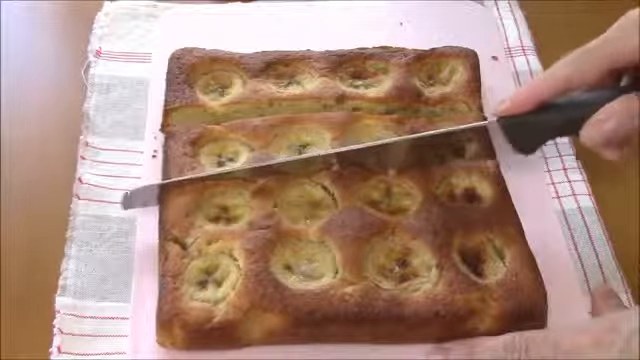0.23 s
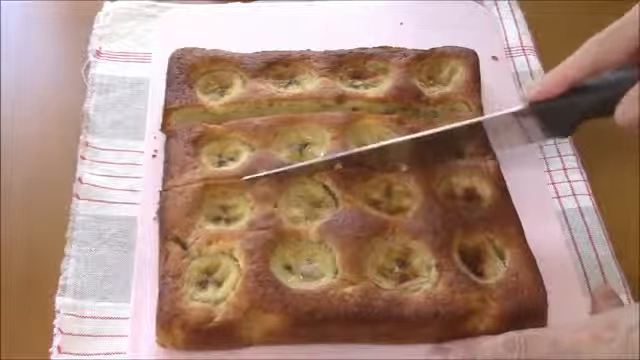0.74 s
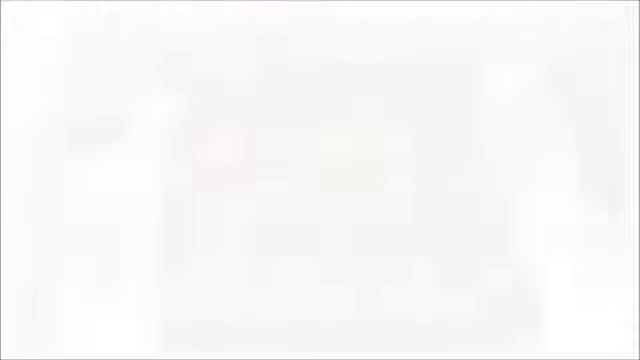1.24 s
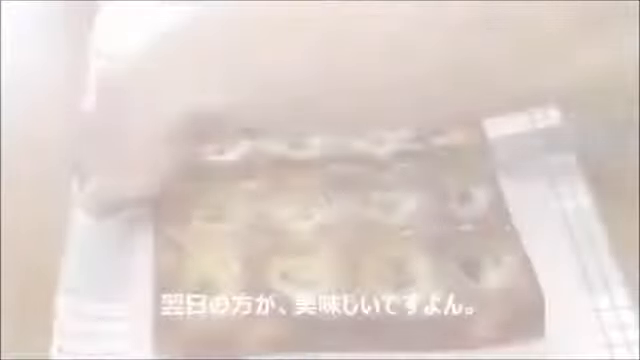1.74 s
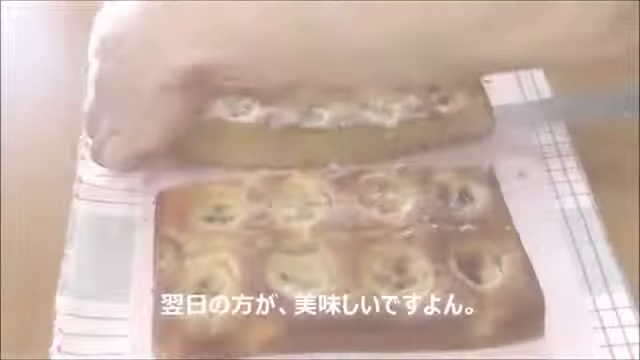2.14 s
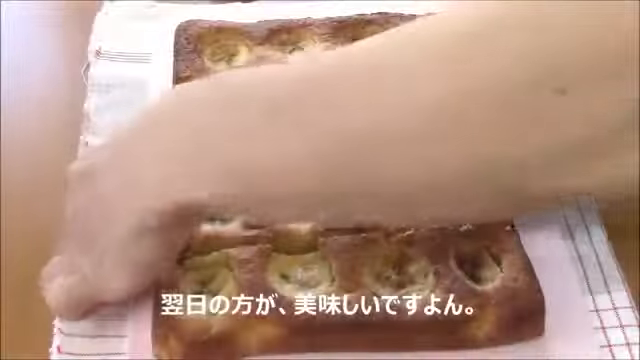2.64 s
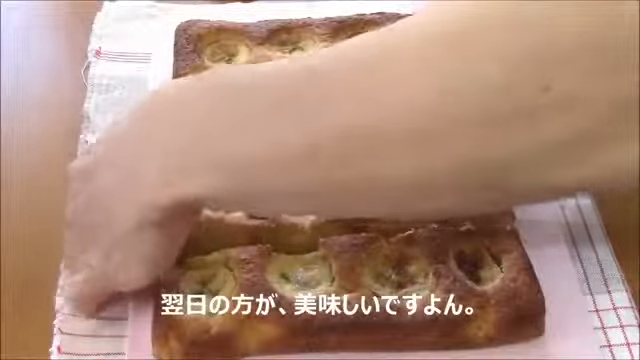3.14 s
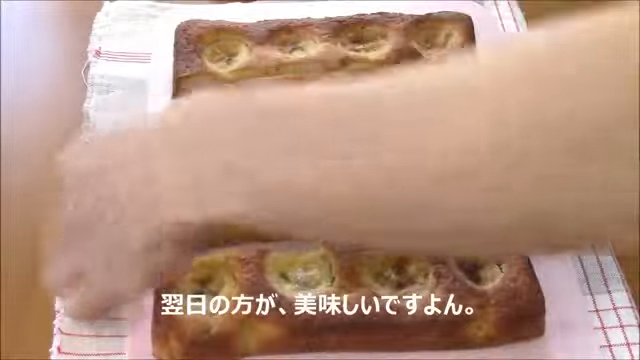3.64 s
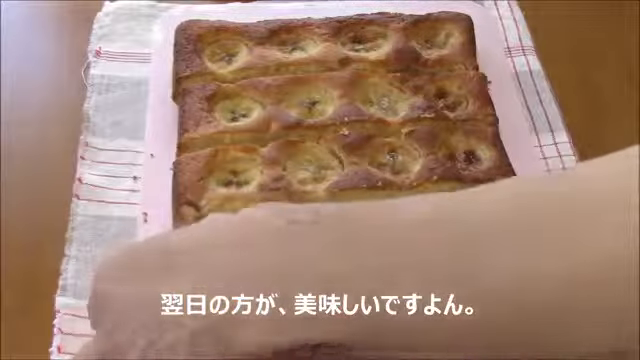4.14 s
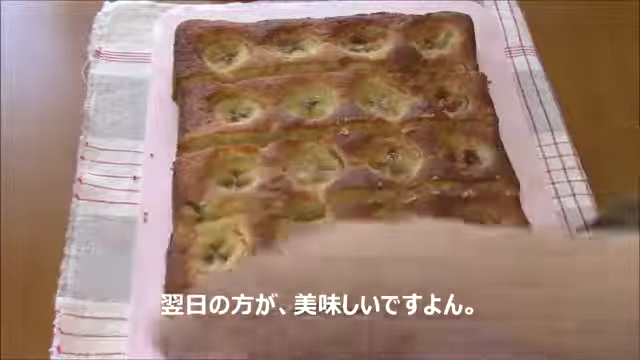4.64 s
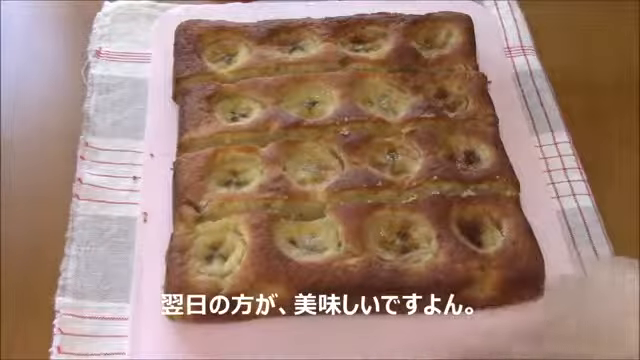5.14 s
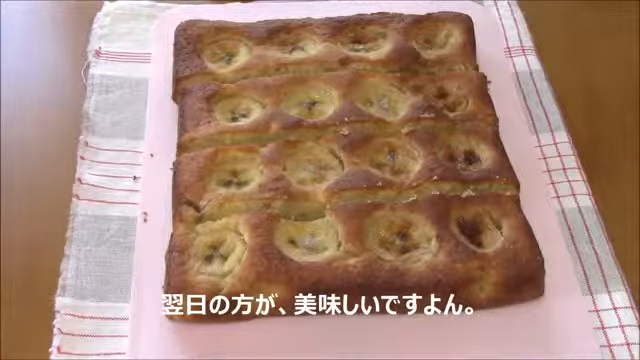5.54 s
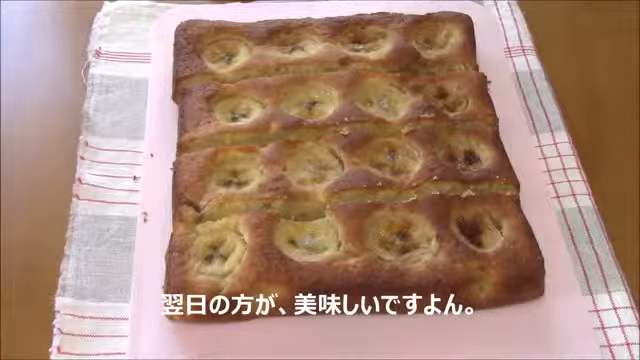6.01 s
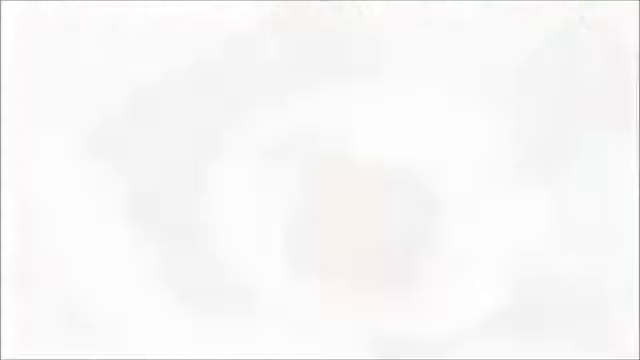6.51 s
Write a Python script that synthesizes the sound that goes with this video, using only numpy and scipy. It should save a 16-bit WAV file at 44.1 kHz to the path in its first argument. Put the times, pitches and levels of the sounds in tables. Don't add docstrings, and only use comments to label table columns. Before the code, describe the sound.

A knife softly saws cake crust with crackly rasps, then its blade scrapes across a plastic board in three harsh sweeps, before a fork clinks on china.

```python
import sys
import numpy as np
from scipy import signal
from scipy.fft import rfft, irfft, next_fast_len
from scipy.io import wavfile
from scipy.ndimage import uniform_filter1d, map_coordinates

SR = 44100
rng = np.random.default_rng(int(sys.argv[2]) if len(sys.argv) > 2 else 0)


def bounce(signal):
    frames = np.transpose(np.atleast_2d(signal))
    limited = np.clip(frames, -1, 1)
    pcm = np.round(limited * 32767).astype(np.int16)
    wavfile.write(sys.argv[1], SR, pcm)


def to_linear_factor(level_db):
    exponent = np.asarray(level_db, float) / 20
    return 10 ** exponent


N = 298557
TIME = np.arange(N) / SR
CUT_S = 6.529

# (peak [s], peak level [dB], rise over 20 dB [s], fall [s], low-mode weight [dB])
SKIMS = [
    (2.383, -28, 0.093, 0.055, -14.5),
    (3.668, -29.5, .09, 0.059, -17.5),
    (4.6, -31, .08, 0.05, -17),
]
PUSHES = [(1.45, -56, .1, 0.14, -3), (1.695, -46, 0.057, 0.097, 2.5), (2.277, -51.5, .003, 0.083, 18),
          (2.48, -50, 0.093, .15, 9), (2.59, -48, 0.096, .1, -2.5), (2.714, -44, 0.0074, .04, -38),
          (2.745, -49, 0.092, .12, 3.5), (2.82, -48, .12, 0.095, 1), (3.95, -55, .03, .2, -8.5),
          (4.07, -47, 0.072, .15, -1.5), (4.14, -46.5, .12, .06, -3.5), (4.645, -44, 0.019, 0.086, -16),
          (3.72, -47, .03, 0.062, -11), (2.33, -36.5, .03, 0.039, 2), (2.43, -40, .02, 0.075, -17),
          (4.54, -41, .06, .03, -9.5), (2.41, -33, .03, .02, -10), (5.066, -64.5, 0.14, 0.045, -5)]
NUDGES = [(1.562, -52.5, 0.08, 0.032, -2), (1.62, -56, 0.014, 0.013, -25), (1.882, -56.5, 0.038, 0.13, -14),
          (1.99, -59, 0.014, 0.056, -1), (2.56, -48.5, .05, .04, 15.5), (4.177, -36.5, .025, .05, -11),
          (4.41, -64, 0.0054, 0.039, 9), (4.456, -56.5, 0.039, .02, 5.5)]
SCRAPES = [(1.346, -44.5, 0.0023, 0.026, 0), (1.37, -51.5, 0.031, .18, 0), (1.74, -52, .1, .11, -5.5),
           (4.624, -30, 0.035, .02, -21), (3.9215, -47, .002, .014, -4), (5.21, -59, 0.079, .04, -14)]
# (roundness of rise [exponent], of fall [exponent], edge ring [dB])
SKIM, PUSH, NUDGE = (2.8, 1.5, -18.5), (1.6, 1.6, -14), (1.2, 1.2, -31)
SCRAPE = (1.5, 1.5, -7.5)
# (time [s], slip rate [1/s], share [0-1])
CHATTER = [
    [(2.296, 300, .5), (2.33, 340, .5), (2.39, 370, .5), (2.42, 370, .4)],
    [(3.555, 110, .5), (3.6, 170, .6), (3.64, 300, .3), (3.7, 330, .2)],
    [(4.505, 95, .95), (4.537, 140, .95), (4.56, 260, .75), (4.632, 360, .7)],
]
# (time [s], moving-mode weight [dB], upper-mode weight [dB], edge weight [dB])
CONTACT = [
    [(1.34, -5, 6, 4), (1.42, 3.5, 1.5, 2), (1.52, -6, 2.5, -5), (1.6, 9, 0, 12), (1.68, -4, -2, 3),
     (1.76, -5.5, 1.5, 5), (1.85, -2.5, -1, 13), (2.0, -1, -3, -7)],
    [(2.28, -9, 3.5, 3), (2.33, 1.5, -5, -1), (2.38, 4.5, 3, 8), (2.43, 1, 3, 9)],
    [(2.48, -1, 5, 11), (2.56, -6.5, 6.5, 2), (2.64, -1, -1, -15), (2.72, 2.5, 4.5, 0), (2.8, 3.5, -9, 1.5),
     (2.88, -5.5, 3, 4)],
    [(3.57, -3, -6.5, -3), (3.62, 2.5, -7.5, -15), (3.67, 1, 0, -0.5), (3.72, 3.5, 0, 8.5),
     (3.78, -11, 7, 4)],
    [(3.92, 0, 7, -2.5), (4.0, 1, -1, -4), (4.07, -1, 3, -7), (4.13, -4, -6, -8), (4.19, -2, -9.5, -14),
     (4.45, 0.5, -8, -16)],
    [(4.51, -37, -20, -15), (4.55, -3, -7, -9), (4.59, 4, 0.5, 1.5), (4.63, 1, 4, 0.5), (4.67, -5, 4, -4),
     (4.72, 2, 2, -2), (5.1, 0, -8, 8)],
]
# (from [s], centre [Hz], width [Hz], blade flutter [dB])
BEND = [(0, 1640, 140, -20), (2.25, 1500, 80.05, -12), (2.45, 1540, 180, -17), (3.5, 1634, 90, -11.5),
        (3.85, 1601, 148, -11), (4.5, 1606, 188, -0.5), (4.638, 1615, 151, -14)]
# (centre [Hz], width [Hz], level [dB])
BOARD = [(518, 25, 0), (750, 200, -0.5), (1276, 94, 14)]
# (centre [Hz], width [Hz], level [dB])
THUD = [(716, 59, 10), (815, 83, 3.5), (1060, 190, 1.5)]
# (centre [Hz], width [Hz], level [dB])
UPPER = [(2253, 55, 5), (2370, 95, 2.5), (2896, 276, -2), (3360, 374, -8.5), (4250, 120, -16)]
# (centre [Hz], width [Hz], level [dB])
TABLE = [(246, 36, -14), (354, 24, -1.5), (442, 44, 7)]
# (centre [Hz], width [Hz], level [dB])
EDGE = [(3810, 500, 3), (5130, 440, 5), (5900, 200, -2), (6960, 740, -6.5), (7200, 240, -4),
        (8700, 510, -9.5), (9400, 230, -4), (11160, 440, -12.5), (11700, 440, -18), (13800, 1000, -29)]
# (centre [Hz], width [Hz], level [dB])
FLUTTER = (5080, 330, 0)
# (frequency [Hz], density [dB per Hz])
SHEEN = [(2800, -32), (3600, 18), (5500, -32), (9000, -7), (15500, -18)]
LOW_CUT_HZ = 385
SHIFT, TRAVEL_PER_S = .035, 9

# (peak [s], peak level [dB], rise [s], fall [s], brightness [dB])
SAWS = [(.02, -66.5, 0.14, .035, 8), (.146, -66.5, .13, 0.081, 3), (.246, -66, 0.022, .18, 5),
        (.42, -60.5, 0.07, 0.054, -1.5), (.57, -60, .09, 0.033, 1.5), (.635, -73, .02, 0.032, 10),
        (.682, -59, 0.013, 0.14, 1), (.826, -62, 0.025, 0.013, 24), (.858, -57, 0.02, 0.026, -6.5),
        (.955, -75, .04, .03, 8), (1.002, -58.5, 0.026, 0.043, -8), (1.13, -65.5, 0.056, 0.073, 8),
        (1.226, -78, .03, .06, 23)]
WIPES = [(5.203, -58.5, 0.062, 0.046, -1), (5.306, -70.5, 0.027, .04, 9.5), (5.425, -58, 0.081, .08, 8.5),
         (5.466, -60.5, 0.056, 0.034, 27), (5.6, -57.5, 0.0072, 0.046, 9)]
SWEEPS = [(4.05, -57, 0.047, .1, 0), (4.108, -56, 0.097, 0.039, 0), (4.176, -80, 0.013, .05, 0)]
SAW, BODY_DB, FIZZ_DB = (0.81, 1.08), -0.5, -3.5
# (centre [Hz], width [Hz], level [dB])
CRUMB = [(240, 54, -6.5), (700, 220, -5), (1130, 110, -0.5), (1640, 1070, -11.5)]
# (centre [Hz], width [Hz], level [dB])
RASP = [(3100, 780, 5), (3920, 410, 10), (4730, 660, 3.5), (6540, 520, 8.5)]
# (frequency [Hz], density [dB per Hz])
FIZZ = [(3820, -64), (6500, -1.5), (8480, -4), (9630, -1.5), (13500, -3.5), (14900, -1), (15500, -19)]

# (time [s], peak level [dB], board over edge [dB])
SNAPS = [(.394, -47, -12), (.5228, -44, -7), (.6788, -39, -7.5), (.8225, -48, 2), (.849, -43, -3),
         (1.3423, -31.5, 0), (2.2742, -46.5, 11), (3.5948, -36, 3.5), (3.9207, -37.5, 4.5),
         (4.1014, -46, 17), (4.9279, -45, 0), (4.9404, -51, 1.5), (5.4424, -47.5, -9), (5.4674, -46, -19),
         (5.5996, -49, -5)]
KNOCKS = [(.9911, -45, -8), (.9958, -46, 7), (1.0006, -55, -1), (1.52, -44, 3.5), (1.9874, -58, 15),
          (2.0462, -59, 9), (3.6124, -48, 23), (4.0462, -45, 9), (4.0614, -50.5, 20), (4.1685, -40, 15),
          (4.2996, -42, 11.5), (4.3054, -54, 11.5), (4.3134, -55.5, 18), (4.3964, -47.5, 14),
          (4.4414, -62, 6), (4.448, -64, 15), (4.4558, -49, 9.5)]
TICKS = [(.0774, -56, -7), (.6314, -58, -6), (.9514, -57, -9), (3.227, -73, 16.5), (3.2424, -60, -4),
         (3.2634, -62, 1), (3.2862, -58.5, 6), (3.3452, -59, 7), (1.671, -55, -6), (1.691, -58, -4),
         (1.761, -59, -2), (1.813, -60, -8), (1.469, -67, -6)]
BITES = [(1.3603, -40, -3), (1.494, -56, 6), (1.6157, -60.5, 7), (1.6526, -56, 4), (1.6601, -50, 5),
         (1.6771, -58, 5), (1.697, -57, 5), (1.8766, -55, 15), (1.535, -48, 9), (1.794, -41, 2),
         (2.754, -51.5, -4), (2.817, -53, -4), (3.716, -46, 0), (4.6305, -40, -3), (1.9934, -54, 6),
         (2.3028, -41, 19), (2.3192, -40, 15), (2.3307, -43, 10), (2.4993, -44, 1), (2.5472, -56, 8),
         (2.5622, -49, 10), (2.6704, -53, 2), (2.6964, -51, 8), (2.7158, -42, 2), (3.5613, -58, 12),
         (3.5853, -45.5, 9.5), (3.6312, -55, 1), (3.9809, -61, 5.5), (4.0153, -54, 9), (4.133, -52.5, 5),
         (4.141, -37, 11.5), (4.5517, -29, -2.5), (4.5981, -40, -0.5), (4.6221, -21, -3), (.0333, -60, -3),
         (.2788, -48, -1), (.811, -54, -6), (.861, -47.5, 8), (.985, -49, -1), (1.006, -56, 6),
         (.557, -54, 3)]
SNAP_TOP_DB, KNOCK_TOP_DB, TICK_TOP_DB, BITE_TOP_DB = -12, -25, 6, -27
# (centre [Hz], width [Hz], level [dB])
KNOCK = [(750, 190, -6.5), (1234, 210, 3), (1660, 113, -0.5), (2280, 176, -8.5)]

# (peak [s], peak level [dB], rise [s], fall [s], table top under the ring [dB])
SLIDES = [(6.535, -41, 0.0063, 0.1, -14.5), (6.578, -35.5, 0.027, 0.084, -17.5),
          (6.632, -48, 0.005, 0.016, -16), (6.672, -47.5, 0.086, .006, -0.5),
          (6.69, -44, 0.0031, 0.0099, -9), (6.72, -48.5, 0.022, 0.063, -17)]
# (centre [Hz], width [Hz], level [dB])
CHINA = [
    [(3620, 210, 7), (4230, 240, 11), (6200, 88, 9), (7500, 180, 8), (8400, 400, -16), (9100, 96, 9), (10000, 150, 1), (12300, 330, -6)],
    [(3570, 73, -5), (3990, 140, 0.5), (4750, 140, -4.5), (6570, 140, -4), (7040, 160, -2.5), (9200, 110, -2), (9700, 100, -4), (10400, 100, -17), (12400, 240, -3.5)],
]
# (time [s], peak level [dB])
CLINKS = [(6.5297, -38), (6.6285, -27.5), (6.657, -35), (6.6754, -20.5), (6.7203, -38.5), (6.754, -44)]
# (frequency [Hz], level [dB], t60 [s])
TINES = [
    [(1157, -2.5, 0.17), (7840, 6, 0.025), (12400, -18, .03)],
    [(1460, -10, .03), (4500, -3, 0.076), (6550, 2.5, 0.044), (7000, -3, 0.058), (9410, -5, .035),
     (10400, -20, .03), (12100, 2.5, .04), (13460, -15, .04)],
    [(1530, -14, 0.023), (4600, -2, 0.092), (6700, 5, 0.081), (7400, 4, 0.06), (10810, 7, 0.028),
     (12400, -9.5, 0.043)],
    [(1510, -15.5, 0.04), (3890, -13, 0.15), (6220, 1.5, 0.068), (9440, -11, 0.082), (12000, 3.5, 0.044),
     (12740, -21, 0.053), (13200, -12, .04), (14620, -18, .08)],
    [(3880, -3, 0.11), (8440, -13, .2), (11600, -2.5, 0.088), (12200, -1, 0.078), (14660, -3, 0.091)],
    [(3920, -1, .1), (5400, -1, .05), (7100, -1, 0.054), (9700, -4, 0.085)],
]

# (frequency [Hz], level [dB], wander [Hz])
HUM = [(679.2, -65, .5), (1118, -81, 8)]
# (frequency [Hz], level [dB])
WHISTLE = [(6950, -88), (13850, -105)]
# (start [s], chirps [count], level [dB])
BURSTS = [(1.63, 4, 0), (2.9, 2, 0), (3.17, 3, -8), (3.495, 1, -5), (5.68, 2, 0), (6.32, 2, 0)]
CHIRP_S, CHIRP_GAP_S = .055, 0.1013
# (frequency [Hz], t60 [s])
KITCHEN = [(300, 0.16), (2000, 0.12), (12000, 0.1)]
# (frequency [Hz], density [dB per Hz])
AIR = [(15, -66), (25, -45), (169, -18), (215, -27), (246, -16.5), (331, -19.5), (445, -13.5), (567, -14.5),
       (666, -15.5), (722, -13.5), (997, -13.5), (1950, -22), (3830, -26.5), (7100, -31.5), (15500, -37)]
AIR_DB = -64
# (frequency [Hz], gain [dB])
MIC = [(60, -29.5), (220, -3), (14700, -1), (15050, -40), (17000, -48)]
# (frequency [Hz], density [dB per Hz])
PREAMP = [(20, 1), (120, -1.5), (300, -50), (1000, -120)]


def drags():
    drag_db, thud_db, edge_db = strokes((SKIMS, SKIM), (PUSHES, PUSH), (NUDGES, NUDGE), (SCRAPES, SCRAPE))
    rate, share = np.maximum(curves(CHATTER), [[1], [0]])
    edge_db = edge_db - 12 * (share > 0) * np.clip(1 - rate / 300, 0, 1)

    judder = (np.diff(np.floor(np.cumsum(rate) / SR), prepend=0) > 0) * np.sqrt(SR / rate)
    judder = judder * to_linear_factor(1.0 * rng.standard_normal(N))
    slip_rate = np.clip(500 * to_linear_factor(.25 * (drag_db + 31.5)), 200, 700)
    slips = grit(slip_rate, spread_db=5.5, smooth=0.42)
    push = to_linear_factor(drag_db) * (np.sqrt(share) * judder + np.sqrt(1 - share) * slips)
    rub = to_linear_factor(drag_db + edge_db + 0.3 * wobble(54)) * rng.standard_normal(N) * np.sqrt(1 - share)

    contact = sum(CONTACT, [(0, 0, 0, 0)]) + [(7, 0.0012, 0.0081, 0.0017)]
    bend_db, upper_db, lean_db = curves([contact])
    hold = np.searchsorted([s for s, *_ in BEND], TIME, side='right') - 1
    bend = 0
    for k, (_, hz, width, _) in enumerate(BEND):
        bend = bend + filtered(push * to_linear_factor(bend_db - 6.0) * (hold == k), resonant([(hz, width, 0)]))

    low_cut = lambda f: resonant(BOARD)(f) * (1j * f / (LOW_CUT_HZ + 1j * f)) ** 2
    upper = sliding(push * to_linear_factor(upper_db - 9), UPPER)
    thud = filtered(push * to_linear_factor(thud_db), resonant(THUD))
    board = to_linear_factor(-4.0) * filtered(push, low_cut) + bend - upper + thud

    skim_db = .9 * np.maximum(drag_db + 49, 0)
    heavy_db = np.minimum(thud_db, 0) - 7.5 - skim_db
    table = filtered(push * to_linear_factor(heavy_db), lambda f: resonant(TABLE)(f) * (f > 180))

    flutter_db = np.array(BEND)[hold, 3]
    flutter = filtered(push * to_linear_factor(edge_db + lean_db + flutter_db), resonant([FLUTTER]))
    ring = sliding(0.36 * push * to_linear_factor(edge_db + lean_db), EDGE)
    sheen = 0.35 * filtered(rub * to_linear_factor(lean_db), coloured(SHEEN))
    return streaky(board + table, depth_db=2.1) + streaky(flutter + ring + sheen, depth_db=2.2)


def crust():
    rasp_db, bright_db = strokes((SAWS + WIPES, SAW))
    cracks = grit(np.full(N, 700.), spread_db=3, smooth=.75) * to_linear_factor(.8 * wobble(40))
    body = filtered(to_linear_factor(rasp_db + BODY_DB - bright_db) * cracks, resonant(CRUMB))
    rasp = filtered(to_linear_factor(rasp_db) * cracks, resonant(RASP))
    fizz = filtered(to_linear_factor(rasp_db + FIZZ_DB + 0.62 * bright_db) * cracks, coloured(FIZZ))

    sweep_db = strokes((SWEEPS, SAW))[0]
    loose = to_linear_factor(sweep_db) * grit(np.full(N, 250.), spread_db=11, smooth=0.29)
    flakes = filtered(loose, resonant([(7700, 950, -0.27), (8800, 1200, -1.6)]))
    return flakes + body + rasp + fizz


def taps():
    kinds = [(SNAPS, SNAP_TOP_DB), (KNOCKS, KNOCK_TOP_DB), (TICKS, TICK_TOP_DB), (BITES, BITE_TOP_DB)]
    rows = [(*row, top_db) for kind, top_db in kinds for row in kind]
    hits, t = np.zeros((3, N + 400)), np.arange(400) / SR
    for s, db, board_db, top_db in rows:
        crack = (t == 0) + .1 * rng.standard_normal(400) * to_linear_factor(-60 * t / .006)
        levels_db = db + np.array([[board_db + 12.5], [9], [top_db + 10.5]])
        hits[:, round(s * SR):][:, :400] += to_linear_factor(levels_db) * crack
    edge = resonant([(4040, 780, -3.0), (5160, 280, -7), (7170, 830, -9.5)])
    top = lambda f: resonant([(11500, 6000, 0)])(f) ** 2
    return filtered(hits[0], resonant(KNOCK)) + filtered(hits[1], edge) + filtered(hits[2], top)


def fork():
    ring_db, table_db = strokes((SLIDES, (1.2, 1.1)))
    grind = to_linear_factor(ring_db - 3) * grit(np.full(N, 1500.), spread_db=4, smooth=.7)
    tilt = np.clip((TIME - 6.56) / 0.0054, 0, 1)
    flat = filtered(grind * (1 - tilt), resonant(CHINA[0]))
    lifted = filtered(grind * tilt, resonant(CHINA[1]))
    glaze = to_linear_factor(-5.5) * filtered(grind, resonant([(5040, 1700, 4.0), (11500, 2900, -3.5)]))
    rumble = to_linear_factor(ring_db + table_db) * rng.standard_normal(N)
    table = filtered(rumble, resonant([(1070, 420, -2.5), (1950, 290, 3.0)]))
    return flat + lifted + glaze + table + clinks()


def clinks():
    out, t = np.zeros(N + SR), np.arange(SR // 4) / SR
    for (s, db), modes in zip(CLINKS, TINES):
        ring = 0
        for hz, level_db, t60_s in modes:
            beat = 1 + .5 * np.sin(2 * np.pi * rng.uniform(49, 160) * t)
            ring = ring + to_linear_factor(level_db - 60 * t / t60_s) * beat * np.sin(2 * np.pi * hz * t)
        crack = np.diff(rng.standard_normal(len(t) + 1)) * to_linear_factor(-60 * t / 0.019)
        out[round(s * SR):][:len(t)] += to_linear_factor(db - 9.0) * (ring + 1.06 * crack)
    return out[:N]


def room(x):
    hz, t, z = signal.stft(rng.standard_normal(SR // 2), SR, nperseg=256)
    decay = to_linear_factor(-60 * t / along(KITCHEN, hz)[:, None])
    tail = signal.istft(z * decay, SR, nperseg=256)[1]
    return signal.fftconvolve(np.pad(x, (150, 0)), tail / np.linalg.norm(tail))[:N]


def motor():
    hum = 0
    for hz, db, wander_hz in HUM:
        turns = np.cumsum(hz + wander_hz * wobble(60)) / SR
        hum = hum + to_linear_factor(db + 6.0 + 0.88 * wobble(2.47)) * np.sin(2 * np.pi * turns)
    band = to_linear_factor(-72 + 0.92 * wobble(25)) * filtered(rng.standard_normal(N), resonant([(1983, 145, 0)]))

    gate = np.zeros(N)
    for s, chirps, db in BURSTS:
        for k in range(chirps):
            middle_s = s + k * CHIRP_GAP_S + CHIRP_S / 2
            gate += to_linear_factor(db) * (abs(TIME - middle_s) < CHIRP_S / 2)
    gate = uniform_filter1d(gate, size=200)
    whistle = 0
    for hz, db in WHISTLE:
        turns = np.cumsum(hz + 15 * wobble(73)) / SR
        whistle = whistle + to_linear_factor(db + 15.5) * np.sin(2 * np.pi * turns)
    return (hum + band + (gate + .12) * whistle) * (TIME < CUT_S)


def room_air():
    drift_db = .6 * wobble(2.77)
    return to_linear_factor(AIR_DB + 2.0 + drift_db) * filtered(rng.standard_normal(N), coloured(AIR))


def strokes(*kinds):
    power, tint, t = 1e-14, 0, TIME[::32]
    for rows, (up, down, *shared) in kinds:
        for s, db, rise_s, fall_s, colour in rows:
            rise = abs((t - s) / rise_s) ** up
            fall = abs((t - s) / fall_s) ** down
            p = to_linear_factor(2 * (db - 20 * np.where(t < s, rise, fall)))
            power = power + p
            tint = tint + np.multiply.outer([colour, *shared], p)
    return [np.interp(TIME, t, c) for c in (10 * np.log10(power), *(tint / power))]


def grit(rate, spread_db, smooth):
    phase = np.cumsum(rate * to_linear_factor(3 * wobble(150))) / SR
    slips = (np.diff(np.floor(phase), prepend=0) > 0) * np.sqrt(SR / rate)
    slips = unit(slips * to_linear_factor(spread_db * np.clip(rng.standard_normal(N), -3, 1.4)))
    smooth = np.clip(smooth, 0, 1)
    return np.sqrt(1 - smooth) * slips + np.sqrt(smooth) * rng.standard_normal(N)


def sliding(x, peaks):
    turn = np.pi / 4 * (1 + np.tanh(2 * wobble(TRAVEL_PER_S)))
    moved = [(hz * (1 + SHIFT * np.clip(hz / 2000 - 1, 0, 1)), width, db) for hz, width, db in peaks]
    return filtered(x * np.cos(turn), resonant(peaks)) + filtered(x * np.sin(turn), resonant(moved))


def streaky(x, depth_db):
    z = signal.stft(x, nperseg=512)[2]
    field = uniform_filter1d(rng.standard_normal(z.shape), size=3, axis=0)
    field = uniform_filter1d(field, size=12, axis=1)
    gain = to_linear_factor(depth_db * unit(field))
    return signal.istft(z * normal(gain), nperseg=512)[1][:N]


def curves(tables):
    out = np.full((len(tables[0][0]) - 1, N), -140.)
    for rows in tables:
        s, *cols = np.transpose(rows)
        on = (TIME >= s[0]) & (TIME <= s[-1])
        out[:, on] = [np.interp(TIME[on], s, c) for c in cols]
    return out


def wobble(rate):
    return map_coordinates(rng.standard_normal(int(N * rate / SR) + 4), [TIME * rate])


def filtered(x, response):
    m = next_fast_len(N + SR // 2)
    return irfft(rfft(x, m) * normal(response(np.fft.rfftfreq(m, 1 / SR))), m)[:N]


def resonant(peaks):
    def response(f):
        total = 0
        for k, (hz, width, db) in enumerate(peaks):
            damping = 1j * f * width
            total = total + (-1) ** k * to_linear_factor(db) * damping / (hz * hz - f * f + damping)
        return total
    return response


def coloured(points):
    return lambda f: to_linear_factor(along(points, f))


def along(points, hz):
    f, v = np.transpose(points)
    return np.interp(np.log(hz + 1), np.log(f + 1), v)


def normal(gain):
    return gain / np.sqrt(np.mean(abs(gain) ** 2))


def unit(x):
    return x / np.sqrt(np.mean(x ** 2) + 1e-20)


def scene():
    knife = drags() + crust() + taps()
    plate = fork()
    echoes = to_linear_factor(-7.0) * room(knife) + to_linear_factor(-11.5) * room(plate)
    return (knife + plate + echoes + room_air() + motor())[None]


def roll_off(x):
    return signal.sosfilt(signal.butter(12, 16450, fs=SR, output="sos"), x)


def record(dry):
    m = next_fast_len(N + 8192)
    mic = coloured(MIC)(np.fft.rfftfreq(m, 1 / SR))
    x = irfft(rfft(dry, m) * mic, m)[:, :N]
    mix = x + to_linear_factor(-92.5) * filtered(rng.standard_normal(N), coloured(PREAMP))
    return roll_off(mix)


dry = scene()
out = record(dry)
bounce(out)
```